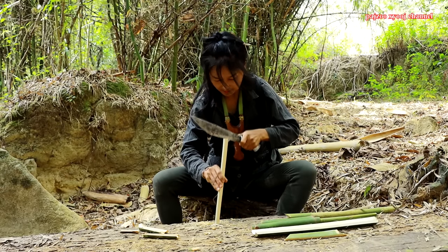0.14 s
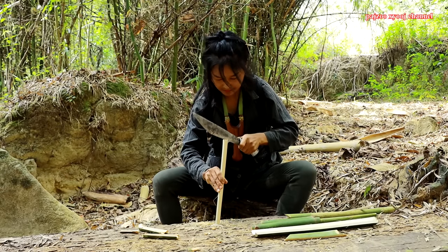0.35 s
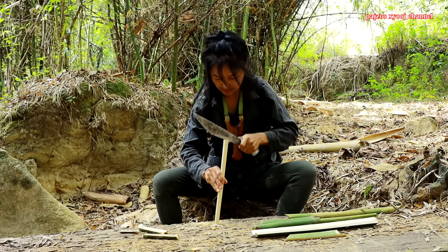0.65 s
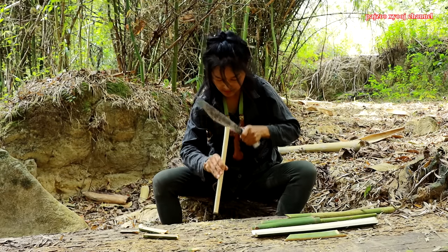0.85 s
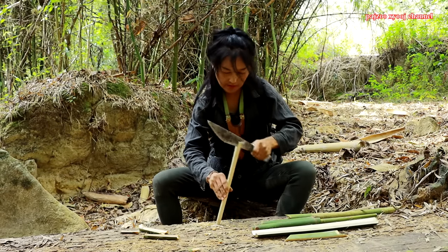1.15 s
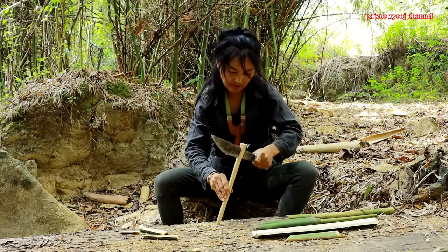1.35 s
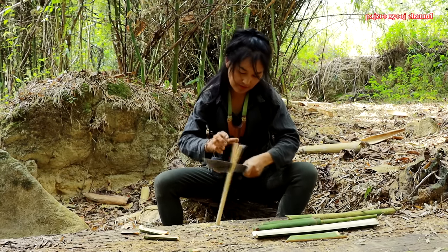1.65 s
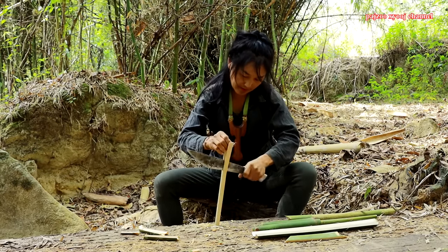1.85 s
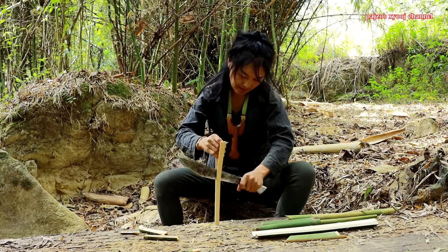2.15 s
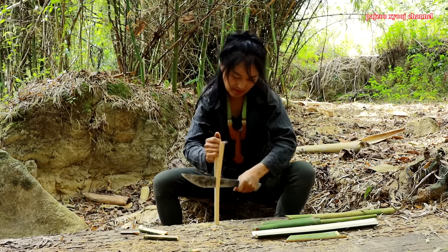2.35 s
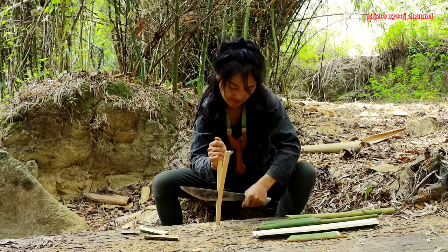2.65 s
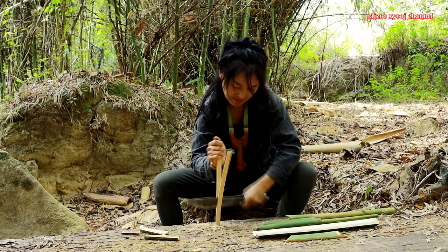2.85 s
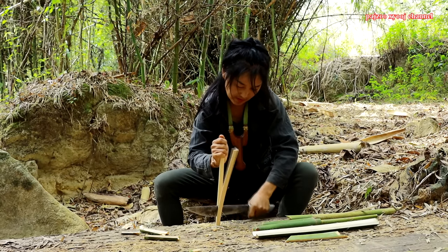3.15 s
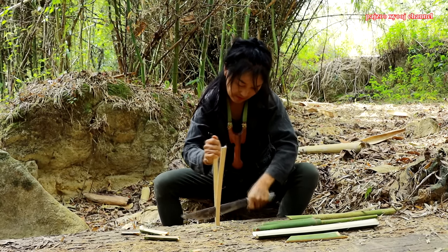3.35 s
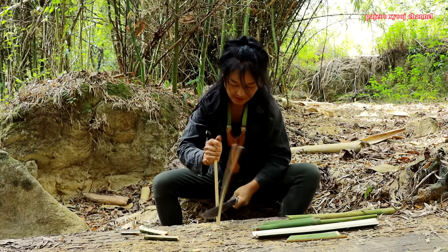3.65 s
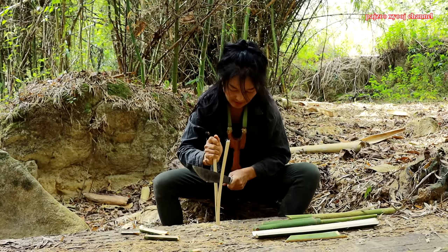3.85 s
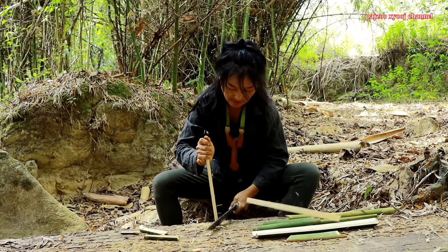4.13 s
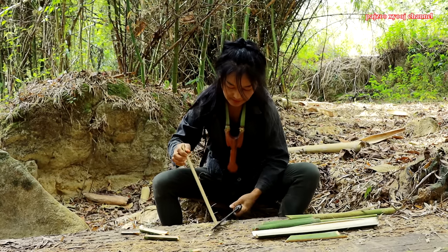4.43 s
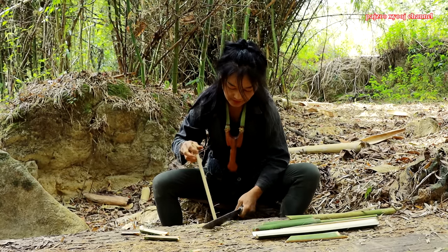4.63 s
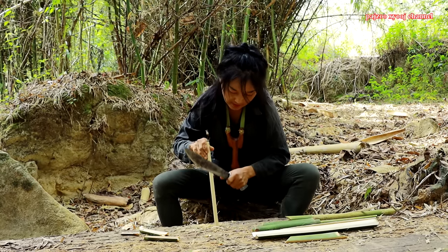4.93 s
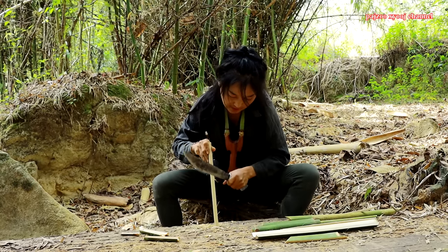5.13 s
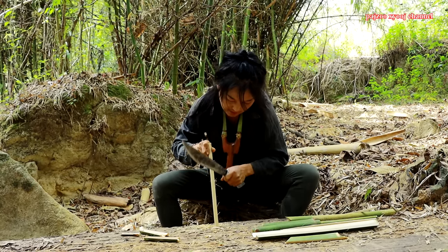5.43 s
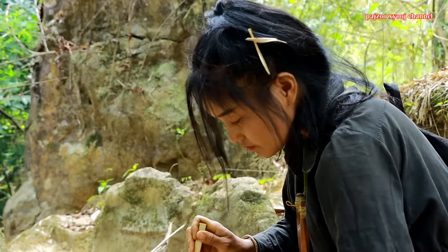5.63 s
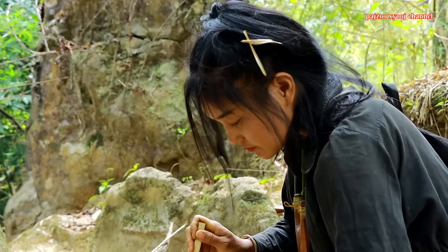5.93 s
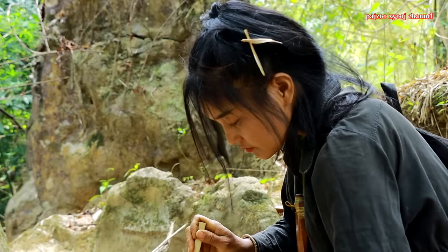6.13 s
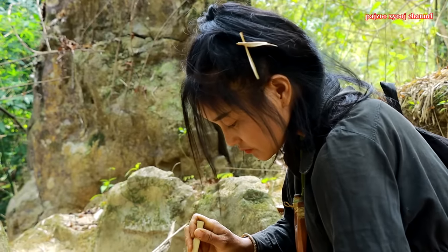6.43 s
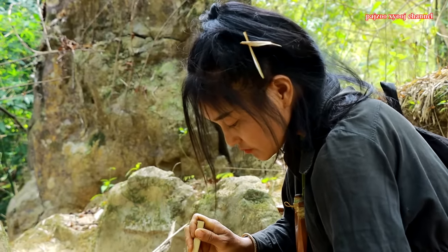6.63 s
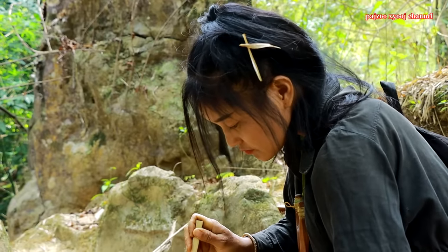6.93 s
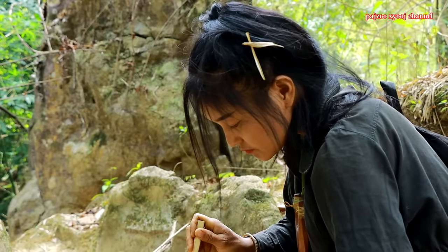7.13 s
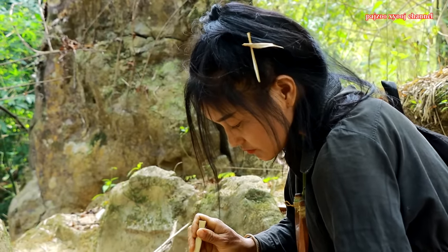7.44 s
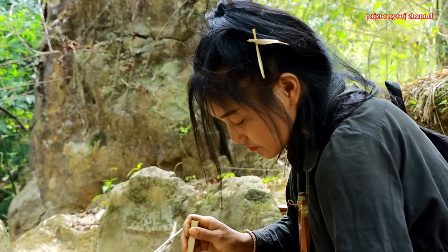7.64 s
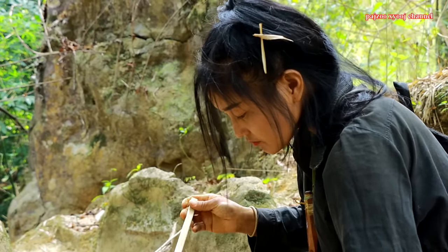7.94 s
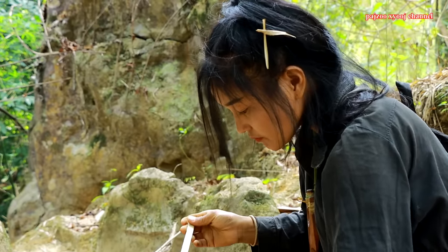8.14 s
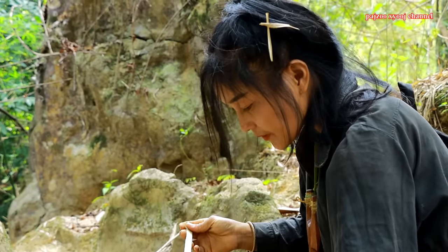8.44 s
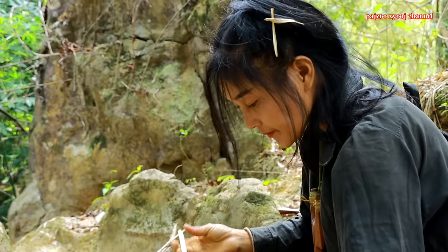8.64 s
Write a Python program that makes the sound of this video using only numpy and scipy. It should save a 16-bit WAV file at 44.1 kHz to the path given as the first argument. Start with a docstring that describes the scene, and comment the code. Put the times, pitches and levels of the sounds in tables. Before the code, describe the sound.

Stereo outdoor pickup, first at a moderate distance, then close. Woody knocks of a knife and bamboo strip against a log give way to small dry splitting cracks, a loud knock and a light clatter. After the change, the cicadas drop back and seven firm, low wooden thumps come about four a second. Soft thuds and a thin blade ring follow, leaving insects and quiet forest air.

```python
"""A bamboo strip is knocked onto a knife blade against a log, splits with small cracks and drops one half.
Then, closer by, seven dull blows drive a piece of bamboo home and the knife is laid aside.
Struck pieces are sums of decaying modes with a noise rattle; cracks and scrapes are bursts of noise grains.
A bird whistles by frequency modulation; a cicada chorus, air and rumble are noise shaped in spectrum,
with calls of nearer cicadas as a gliding resonance; decaying noise gives the echo."""
import sys
import numpy as np
from scipy import signal
from scipy.fft import rfft, irfft
from scipy.io import wavfile
from scipy.ndimage import uniform_filter1d

SR = 44100
rng = np.random.default_rng(int(sys.argv[2]) if len(sys.argv) > 2 else 0)


def log_audio(samples):
    """Write samples as a 16-bit WAV file to the path given in sys.argv[1]."""
    # one column per channel
    frames = np.atleast_2d(samples).T
    # limit to full scale, then quantise
    limited = np.clip(frames, -1, 1)
    pcm = np.round(limited * 32767).astype(np.int16)
    wavfile.write(sys.argv[1], SR, pcm)


N = 387198
T = np.arange(N) / SR
MOVE_S = 5.585  # the forest is heard from a wide spot before this time [s], from a close one after it


def amp(db):
    """Level definition: decibels to an amplitude ratio."""
    return 10 ** (np.asarray(db) / 20)


def unit(x):
    """Normalisation: scales to an rms value of 1."""
    return x / np.sqrt(np.mean(x ** 2) + 1e-20)


def value_at(points, hz):
    """Logarithmic pitch scale: interpolates a frequency table on a log-frequency axis."""
    f, value = np.transpose(points)
    return np.interp(np.log(hz + 1), np.log(f), value)


def level_at(rows, t):
    """Envelope: interpolates a (time [s], level [dB]) table at the times t."""
    s, db = np.transpose(rows)
    return np.interp(t, s, db)


def add(mix, s, sound):
    """Superposition: mixes a sound in, starting at time s."""
    part = mix[..., max(round(s * SR), 0):][..., :sound.shape[-1]]
    part += sound[..., :part.shape[-1]]


def butter(x, hz, kind, order=2):
    """Causal filtering: a Butterworth low-pass or high-pass."""
    return signal.sosfilt(signal.butter(order, min(hz, .45 * SR), kind, fs=SR, output="sos"), x)


def colour(x, spectrum):
    """Spectral shaping: weights the Fourier transform by a table; white noise keeps its power."""
    gain = unit(amp(value_at(spectrum, np.fft.rfftfreq(N, 1 / SR))))
    return irfft(rfft(x) * gain, N)


def noise_pair(alike, size=N):
    """Partial coherence: white noise in two channels with the correlation `alike`."""
    a, b = rng.standard_normal((2, size))
    alike = np.clip(alike, -1, 1)
    return np.array([a, alike * a + np.sqrt(1 - alike ** 2) * b])


def pan(x, left_db):
    """Interchannel level difference: raises the left channel over the right."""
    return x * amp([[left_db / 2], [-left_db / 2]])


SPOT_DB = 1.4  # each blow lands on another spot: standard deviation of the mode levels [dB]


def strike(rows, modes, rattle_db, rattle_t60, low_hz, detune):
    """Modal excitation: a blow rings decaying modes and dense overtones; a softer contact dulls both."""
    t, out = np.arange(SR // 2) / SR, np.zeros((2, N))
    hz, mode_db, t60 = np.transpose(modes)[:, :, None]
    # the bending wave takes time to run along the piece, so the modes do not peak together
    lag = 2 * np.pi / 3 * np.arange(len(modes))[:, None]
    for s, db, bright_hz, *ring_db in rows:
        # no two blows meet the piece in the same way
        grip = 1 + detune * rng.standard_normal(hz.shape)
        spot_db = SPOT_DB * rng.standard_normal(hz.shape)
        decay = amp(mode_db + spot_db - 60 * t / t60)
        ring = (decay * np.cos(2 * np.pi * hz * grip * t - lag)).sum(0)
        rattle = noise_pair(alike=0.53, size=len(t)) * amp(rattle_db - 60 * t / rattle_t60)
        dulled = butter(ring * amp(sum(ring_db)) + rattle, bright_hz, "low")
        sound = butter(dulled, low_hz, "high")
        # the level is that of the blow's energy packed into 10 ms
        add(out, s, amp(db) * unit(sound) * np.sqrt(.01 / t[-1]))
    return out


# hands and feet keep nudging the log at random
FIDGET_PER_S, FIDGET_DB, FIDGET_SPREAD_DB = 5.5, -65.5, 1


def fidgets():
    """Random excitation: faint nudges before the move, as rows (time [s], level [dB])."""
    draws = rng.random((round(FIDGET_PER_S * MOVE_S), 2))
    return [(when * MOVE_S, FIDGET_DB + FIDGET_SPREAD_DB * (2 * force - 1)) for when, force in draws]


# modes of the upright strip: (frequency [Hz], relative level [dB], 60 dB decay time [s])
STRIP_MODES = [(308, -1.5, 0.024), (560, 0.5, 0.044), (740, 1, 0.046), (857, -2, 0.03), (1001, -3, 0.05),
               (1200, -11, .04), (1493, -12.5, 0.025), (1946, -9.5, .05), (2490, -15, .05),
               (3600, -21, .02)]
# modes of the log: (frequency [Hz], relative level [dB], 60 dB decay time [s])
LOG_MODES = [(95, 2, 0.051), (140, 6, 0.073), (206, -2.5, 0.126)]
# knife and strip knocked on the log: (time [s], level [dB], low-pass brightness [Hz],
# thump of the log [dB], first touch relative to the knock [dB])
KNOCKS = [(0.048, -43.5, 1045, -35.5, -4.5), (.189, -34.5, 1190, -32.5, -6), (.307, -40, 1560, -33, -0.5),
          (0.7043, -32, 1300, -35, -11), (.840, -31, 1760, -36.5, 5), (0.9705, -20.5, 1570, -46, -10),
          (1.093, -28.5, 1680, -38, -28), (2.091, -64, 6130, -64, -18), (3.166, -46.5, 4120, -58, -5),
          (4.058, -4.5, 1490, -27, -34)]
# soft bumps of hand and strip against the log: (time [s], level [dB])
LOG_BUMPS = [(1.362, -49.5), (1.601, -49), (2.479, -54), (2.953, -53), (3.53, -48), (3.649, -49.5),
             (4.541, -54), (4.94, -61.5)]
TOUCH_LEAD_S = .008  # the strip first touches this long before the weight of the knife lands on it


def knocks():
    """Coupled impact: the upright strip touches, then knocks, and the log beneath it thumps."""
    main = [row[:3] for row in KNOCKS]
    touches = [(s - TOUCH_LEAD_S, db + touch_db, hz) for s, db, hz, _, touch_db in KNOCKS]
    strip = strike(main + touches, STRIP_MODES, rattle_db=3.5, rattle_t60=0.082, low_hz=146, detune=0.057)
    thumps = [(s, thump_db) for s, _, _, thump_db, _ in KNOCKS] + LOG_BUMPS + fidgets()
    log_rows = [(s, db, 260) for s, db in thumps]
    log = strike(log_rows, LOG_MODES, rattle_db=18.5, rattle_t60=0.084, low_hz=50.3, detune=0.18)
    return pan(strip + log, left_db=-0.2)


# short noise bursts: fibres tearing, a bright first contact of the last knock, the knife scraping
# as it is laid down: (time of the height [s], level before the bright gain [dB],
# half length [s], part with the strip's colour relative to that level [dB])
NOISE_BURSTS = [(1.26, -49, 0.022, -10.5), (1.488, -49.5, 0.016, -12), (2.0, -55, .028, -10),
                (2.094, -46, 0.0046, 7), (2.271, -47.5, 0.015, -9), (2.583, -44, 0.017, -11),
                (2.621, -43, 0.0043, -20), (2.82, -44, 0.019, -16), (3.088, -42, 0.014, -12),
                (3.316, -59, 0.012, 11.5), (4.039, -41.5, 0.0046, 10), (4.054, -36, .0035, 19.5),
                (5.155, -57.5, .024, -4), (5.399, -54, 0.055, -2.5), (5.842, -50, .017, 0.5),
                (8.19, -43.5, 0.015, 6.5), (8.295, -52.5, .058, 2)]
# colour of the bright part: (frequency [Hz], relative density [dB])
BRIGHT_COLOUR = [(1000, -30.5), (4000, -1), (8000, 2), (11000, 5.5), (14000, 2), (16000, -21.5)]
# colour of the part shaped by the strip: (frequency [Hz], relative density [dB])
STRIP_COLOUR = [(100, -1), (400, 4.5), (1200, 4.5), (3200, 1.5), (5000, -14), (9000, -33.5), (16000, -37.5)]
BRIGHT_GAIN_DB = 7.0
# the blade bites deeper with each knock, this far below it
BITE_DB, BITE_HALF_S, BITE_BODY_DB = -28.5, .007, 0.5
# the driven piece rubs on the way down, before each blow
RUB_LEAD_S, RUB_DB, RUB_HALF_S, RUB_BODY_DB = 0.015, -57.5, .035, 6.5
# fibres crunch under each blow, this far below it
CRUNCH_DB, CRUNCH_HALF_S, CRUNCH_BODY_DB = -31, 0.0015, -11.5


def cracks_and_scrapes():
    """Granular noise: short bursts of uneven grains, a bright part plus a part coloured by the strip."""
    bites = [(s, db + BITE_DB, BITE_HALF_S, BITE_BODY_DB) for s, db, *_ in KNOCKS]
    rubs = [(s - RUB_LEAD_S, RUB_DB, RUB_HALF_S, RUB_BODY_DB) for s, *_ in BLOWS]
    crunches = [(s, db + CRUNCH_DB, CRUNCH_HALF_S, CRUNCH_BODY_DB) for s, db, _ in BLOWS]
    bright, body = np.zeros((2, 2, N))
    # noise whose strength jumps every 16 samples
    force_db = 3.54 * np.minimum(rng.exponential(1, N // 16 + 1), 5)
    grains = unit(noise_pair(alike=0.084) * amp(force_db).repeat(16)[:N])
    for s, db, half_s, body_db in NOISE_BURSTS + bites + rubs + crunches:
        span = slice(max(round((s - 4 * half_s) * SR), 0), round((s + 4 * half_s) * SR))
        burst = grains[:, span] * amp(db) * np.exp(-abs((T[span] - s) / half_s) ** 1.2)
        bright[:, span] += burst
        body[:, span] += burst * amp(body_db)
    bright = amp(BRIGHT_GAIN_DB) * colour(bright, BRIGHT_COLOUR)
    return pan(bright + colour(body, STRIP_COLOUR), left_db=-1.1)


# the strip creaks as it gives: (time [s], length of the slipping [s], level [dB])
CREAKS = [(2.798, 0.037, -52)]
# modes of the bent strip: (frequency [Hz], relative level [dB], 60 dB decay time [s])
CREAK_MODES = [(620, -8.5, 0.047), (1220, -13, .03), (1850, -3, .04), (2990, 0.5, 0.044)]


def creak(slips_per_s):
    """Stick-slip excitation: uneven slips of the blade in the split ring the bent strip."""
    t, out = np.arange(SR // 8) / SR, np.zeros((2, N))
    hz, mode_db, t60 = np.transpose(CREAK_MODES)[:, :, None]
    ring = (amp(mode_db - 60 * t / t60) * np.sin(2 * np.pi * hz * t)).sum(0)
    for s, length, db in CREAKS:
        slipping = (rng.random(len(t)) < slips_per_s / SR) * (t < length)
        slips = rng.standard_normal(len(t)) * slipping
        sound = unit(signal.fftconvolve(slips, ring)[:len(t)])
        add(out, s, amp(db) * sound * np.sqrt(length / t[-1]))
    return out


# the split half lands and bounces: (time [s], level [dB], low-pass brightness [Hz],
# how freely it rings: gain of the modes over the rattle [dB])
BOUNCES = [(4.171, -17, 5560, 5.5), (4.225, -30.5, 3670, -2.5), (4.386, -33, 3440, -8),
           (4.403, -35, 3500, -8.5), (4.411, -29.5, 2430, 17), (4.484, -35.5, 2260, -7)]
# modes of the fallen half: (frequency [Hz], relative level [dB], 60 dB decay time [s])
LOOSE_HALF_MODES = [(430, 3, 0.0071), (820, -28.5, 0.8), (1635, 4.5, 0.12), (1650, -14, 0.28),
                    (1875, 8.5, 0.015), (2280, -32, 0.17), (2720, -13.5, 0.04), (3410, -31, 0.18),
                    (5170, -18, 0.065)]


def bounces():
    """Free vibration: the fallen half clatters, ringing more or less freely at each bounce."""
    clatter = strike(BOUNCES, LOOSE_HALF_MODES, rattle_db=4.5, rattle_t60=0.095, low_hz=199, detune=0.0064)
    return pan(clatter, left_db=-1.0)


# close blows on the stake: (time [s], level [dB], low-pass brightness [Hz])
BLOWS = [(6.1076, -15.5, 1320), (6.357, -9.5, 2600), (6.614, -12.5, 1400), (6.8513, -12, 1400),
         (7.094, -9, 1530), (7.326, -7, 1430), (7.564, -6, 1500)]
# modes of the driven piece: (frequency [Hz], relative level [dB], 60 dB decay time [s])
STAKE_MODES = [(111.5, -26, 0.15), (155.7, -9.5, 0.11), (206, -10, 0.14), (294.5, -0.5, 0.097),
               (370, 3.5, 0.03), (416, -8, 0.079), (541, -0.5, 0.057), (634, -9.5, 0.11), (738, 2.5, 0.02),
               (1122, -11.5, 0.044), (1307, -5.5, 0.0078), (1570, -8, 0.018), (2376, -10, 0.017),
               (3330, -24.5, .05)]
# things are set down with dull thuds: (time [s], level [dB])
THUDS = [(5.759, -45), (8.195, -33), (8.236, -37), (8.305, -24.5), (8.356, -33), (8.373, -39.5),
         (8.392, -38)]
LIFT_LEAD_S, LIFT_DB = .094, -49.5  # a soft thud as the piece is lifted before each blow
THUD_HZ = 880  # brightness of lifts and thuds


def stake():
    """Damped resonance: each blow follows a soft lift; things set down thud with the same ring."""
    soft = [(s - LIFT_LEAD_S, LIFT_DB) for s, *_ in BLOWS] + THUDS
    rows = BLOWS + [(s, db, THUD_HZ) for s, db in soft]
    hits = strike(rows, STAKE_MODES, rattle_db=-6.0, rattle_t60=0.09, low_hz=99.2, detune=.015)
    return pan(hits, left_db=-3.0)


# the blade touches down: (time [s], level [dB], low-pass brightness [Hz])
CLINKS = [(8.182, -36, 5000), (8.191, -34, 8000), (8.292, -45.5, 7000), (8.385, -41.5, 450)]
# modes of the blade: (frequency [Hz], relative level [dB], 60 dB decay time [s])
BLADE_MODES = [(427, 1, 0.42), (2100, -9, 0.35), (2928, -1, 0.56), (3200, 8.5, 0.059), (3820, -6, 0.5),
               (7680, 6, 0.2), (9380, 0, 0.18)]


def clinks():
    """Light damping: the blade rings long in narrow modes as the knife is laid aside."""
    touchdowns = strike(CLINKS, BLADE_MODES, rattle_db=15.5, rattle_t60=0.021, low_hz=202, detune=0.0007)
    return pan(touchdowns, left_db=-6)


# bird notes: (time [s], length [s], pitch at the start [Hz], in the middle [Hz], at the end [Hz],
# level before the song gain [dB])
BIRD_NOTES = [(1.307, 0.025, 2210, 1890, 1680, -60), (1.354, .045, 1916, 2090, 2730, -53.5),
              (1.401, 0.031, 2265, 2000, 1930, -57), (1.477, 0.053, 2800, 2550, 1870, -53),
              (1.641, .036, 2790, 2780, 3700, -54), (1.705, 0.058, 2245, 2290, 2710, -56),
              (1.765, 0.031, 2890, 2710, 2320, -57.5), (4.686, 0.0547, 2510, 2440, 2240, -59.5),
              (7.984, 0.18, 1907, 2210, 2210, -65), (8.66, 0.14, 2070, 2005, 2010, -72)]
SONG_GAIN_DB = 8


def bird():
    """Frequency modulation: slurred, slightly husky whistles, each bending through three pitches."""
    out = np.zeros((2, N))
    for s, length, *pitches, db in BIRD_NOTES:
        t = np.arange(0, length, 1 / SR)
        hz = np.interp(t, np.linspace(0, length, len(pitches)), pitches)
        waver = 1 + .018 * unit(butter(rng.standard_normal(len(t)), 400, "low"))  # huskiness
        whistle = np.sin(2 * np.pi * np.cumsum(hz * waver) / SR)
        add(out, s, amp(db) * whistle * signal.windows.tukey(len(t), .4))
    return amp(SONG_GAIN_DB) * pan(out, left_db=-3.5)


# decay of the echo: (frequency [Hz], 60 dB decay time [s])
ECHO_T60 = [(100, 1), (500, 0.36), (1500, 0.75), (4000, 0.048), (12000, 0.021)]


def echo(x, alike):
    """Diffuse scattering from the stems and the earth bank, each band dying at its own speed."""
    hz, t, z = signal.stft(noise_pair(alike, size=SR // 2), SR, nperseg=256)
    decay = amp(-60 * t / value_at(ECHO_T60, hz)[:, None])
    build_up = np.minimum(t / 0.022, 1)
    tail = signal.istft(z * decay * build_up, SR, nperseg=256)[1]
    return signal.fftconvolve(x, tail / np.linalg.norm(tail[0]), axes=1)[:, :N]


# bouts of evenly spaced calls by the nearest cicadas: (first call [s], last call [s],
# number of calls [count], half length [s], top pitch [Hz], level at the top [dB])
BOUTS = [(0.261, 1.453, 5, 0.095, 6660, -46), (1.706, 2.47, 4, 0.078, 6600, -48.5),
         (2.798, 3.765, 4, 0.094, 6750, -47), (4.252, 5.343, 3, 0.15, 6750, -43.5),
         (5.666, 7.648, 4, 0.074, 7450, -51.5), (6.054, 9.164, 6, 0.092, 6810, -43.5)]


def near_cicadas(rest_wide_hz, rest_close_hz, width_hz, linger, alike):
    """Gliding resonance: in each call the body's peak slides up from rest and back, loudest at the top."""
    hz, t, z = signal.stft(noise_pair(alike), SR, nperseg=512, noverlap=384)
    rest_hz, power = np.where(t < MOVE_S, rest_wide_hz, rest_close_hz), 0
    for first_s, last_s, count, half_s, top_hz, db in BOUTS:
        for s in np.linspace(first_s, last_s, round(count)):
            u = (t - s) / half_s
            centre_hz = rest_hz + (top_hz - rest_hz) * np.exp(-u ** 2 / 2)
            resonance = (1 + ((hz[:, None] - centre_hz) / width_hz) ** 2) ** -3
            loudness = amp(db) ** 2 * np.exp(-(u / linger) ** 2)
            power = power + resonance / resonance.mean(0) * loudness
    return signal.istft(z * np.sqrt(power), SR, nperseg=512, noverlap=384)[1][:, :N]


def chorus(spectrum, level_db, patchy_db, alike):
    """Shaped noise: massed tymbal buzz of far cicadas, with thin lines that slowly wax and wane at random."""
    hz, t, z = signal.stft(noise_pair(alike), SR, nperseg=2048, noverlap=1536)
    lines = unit(uniform_filter1d(rng.standard_normal(z.shape[1:]), size=14, axis=1))
    z = z * amp(value_at(spectrum, hz)[:, None] + patchy_db * lines)
    buzz = signal.istft(z, SR, nperseg=2048, noverlap=1536)[1][:, :N]
    return unit(buzz) * amp(level_db)


# colour of the low rumble: (frequency [Hz], relative density [dB])
RUMBLE_COLOUR = [(15, -15.5), (45, 2.5), (90, 1), (150, -12.5), (300, -32), (1000, -71.5)]
# course of the low rumble: (time [s], level before gain and lumps [dB])
RUMBLE_LEVEL = [(0.4, -77), (0.89, -65), (1.63, -77), (2.7, -68.5), (3.52, -74), (4.15, -63), (4.76, -75),
                (5.9, -83)]


def rumble(gain_db, lumpy_db):
    """Amplitude modulation: low noise that comes in lumps, its level swayed by slow noise."""
    lumps = unit(uniform_filter1d(rng.standard_normal(N), size=4096))
    low_noise = pan(colour(noise_pair(alike=0.79), RUMBLE_COLOUR), left_db=7.5)
    return low_noise * amp(level_at(RUMBLE_LEVEL, T) + gain_db + lumpy_db * lumps)


# forest air at the wide spot: (frequency [Hz], relative density [dB])
AIR_WIDE = [(20, -1), (80, -10), (200, -0.5), (500, -1.5), (1500, -5), (3500, -9.5), (8000, -53.5),
            (15000, -54)]
# forest air at the close spot: (frequency [Hz], relative density [dB])
AIR_CLOSE = [(20, -24), (70, 0), (150, 5), (550, 4), (1000, 3.5), (2200, -3.5), (3500, -20.5),
             (15000, -27.5)]
# course of the forest air: (time [s], level [dB])
AIR_LEVEL = [(0, -64.5), (3.7, -63.3), (4.1, -59.5), (7.6, -57), (7.9, -64)]


def air():
    """Broadband noise: the forest air, coloured for each spot."""
    wide = colour(noise_pair(alike=.55), AIR_WIDE)
    close = colour(noise_pair(alike=0.64), AIR_CLOSE)
    return np.where(T < MOVE_S, wide, close) * amp(level_at(AIR_LEVEL, T))


# colour of the chorus at the wide spot: (frequency [Hz], relative density [dB])
CHORUS_WIDE = [(3000, -41), (4200, -43.5), (4800, -28.5), (5300, -8.5), (5750, 0), (6300, -5.5),
               (7000, -18), (8000, -29), (9400, -39), (11500, -34), (13000, -37), (15500, -51)]
# colour of the chorus at the close spot: (frequency [Hz], relative density [dB])
CHORUS_CLOSE = [(3000, -24), (4000, -27), (4700, -9), (5300, -4.5), (5700, 4), (6300, -4), (7000, -14),
                (8000, -22), (9400, -26.5), (11800, -23.5), (14200, -33), (15500, -52)]
# the massed chorus at the wide spot: (time [s], level [dB])
CHORUS_LEVEL = [(0, -36.5), (3.74, -36), (3.8, -33.5), (5.57, -32.6)]


def forest():
    """Superposed background: cicadas, air and rumble, heard from the wide spot and then the close one."""
    near = near_cicadas(rest_wide_hz=5093, rest_close_hz=4760, width_hz=700, linger=1.78, alike=0.095)
    far_wide = chorus(CHORUS_WIDE, level_at(CHORUS_LEVEL, T), patchy_db=3.5, alike=0.059)
    far_close = chorus(CHORUS_CLOSE, level_db=-42.5, patchy_db=4.5, alike=0.058)
    wide = pan(far_wide + near, left_db=0.9)
    close = pan(far_close + near, left_db=-4.0)
    return np.where(T < MOVE_S, wide, close) + air() + rumble(gain_db=-0.5, lumpy_db=5.0)


def scene():
    """Direct and scattered sound: the bamboo work and the bird with their echoes, and the forest."""
    # all cracks and scrapes, early and late, share the echo of the splitting
    splitting = knocks() + bounces() + cracks_and_scrapes() + creak(slips_per_s=600)
    driving = stake() + clinks()
    song = bird()
    echoes = amp(-34.5) * echo(splitting, alike=0.67) + amp(-39.5) * echo(driving, alike=1.0)
    echoes += amp(-11.5) * echo(song, alike=0.11)
    return splitting + driving + song + echoes + forest()


TOP_HZ = 15800  # upper band limit


def record(dry):
    """Peak limiting: the hardest blows are held near full scale and duck the forest; then the band limit."""
    peak_db = 20 * np.log10(abs(dry).max(0) + 1e-9)
    recovery = T * 110  # dB, growing by 110 dB a second
    held_db = np.maximum.accumulate(peak_db + recovery) - recovery
    over_db = np.maximum(held_db + 0.5, 0)  # excess over -0.5 dB of full scale
    ducked = np.clip(dry * amp(-uniform_filter1d(over_db, size=24)), -1, 1)
    low_pass = signal.firwin(511, TOP_HZ, window=("kaiser", 9), fs=SR)
    return signal.oaconvolve(ducked, low_pass[None], "same")


dry = scene()
out = record(dry)
log_audio(out)
```